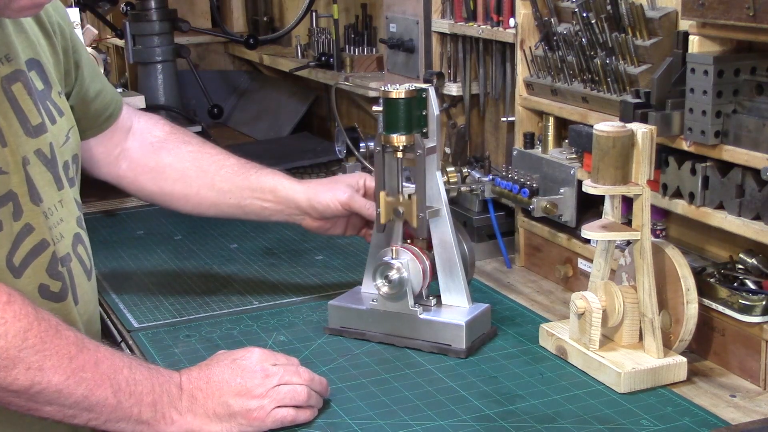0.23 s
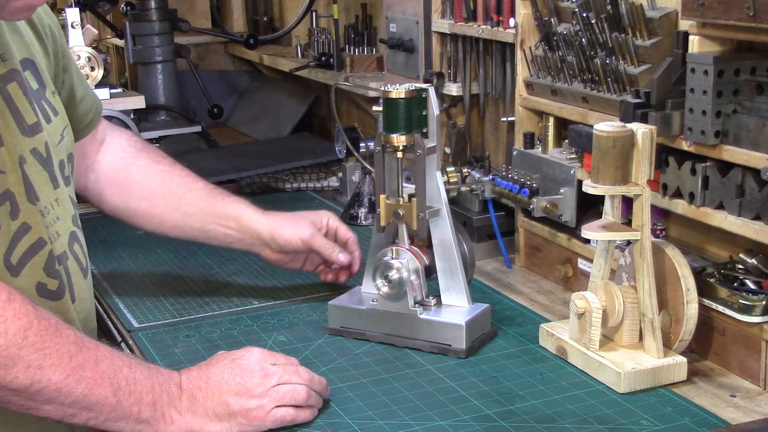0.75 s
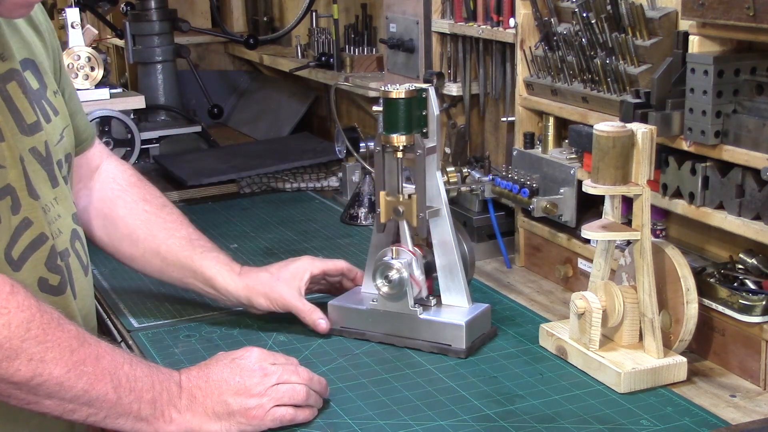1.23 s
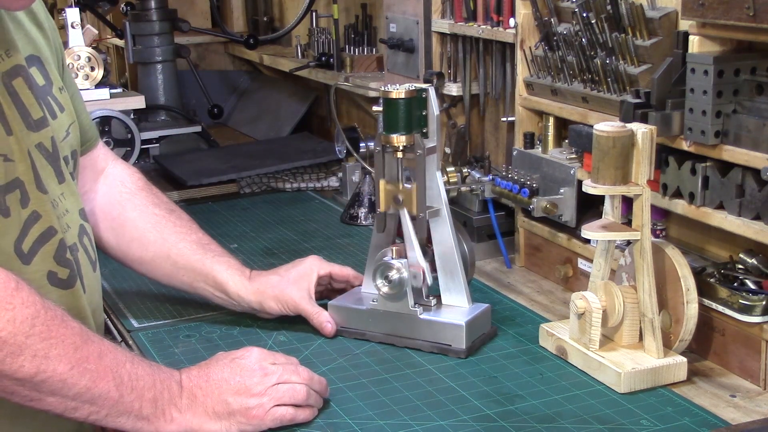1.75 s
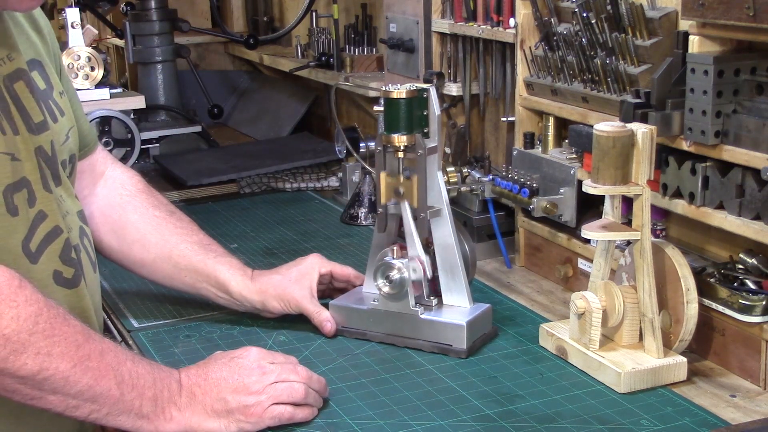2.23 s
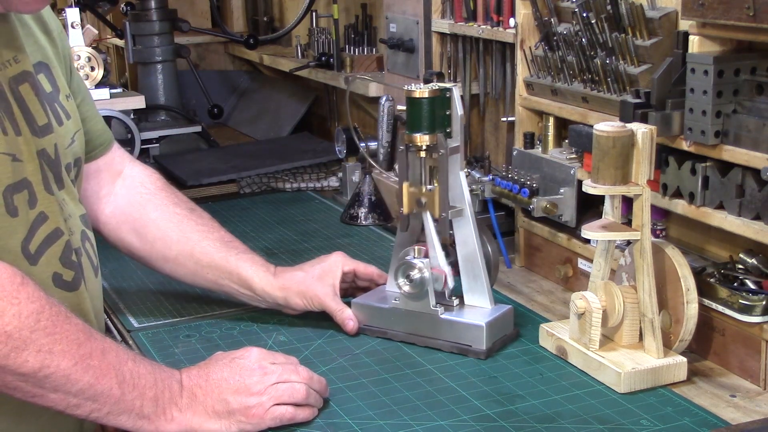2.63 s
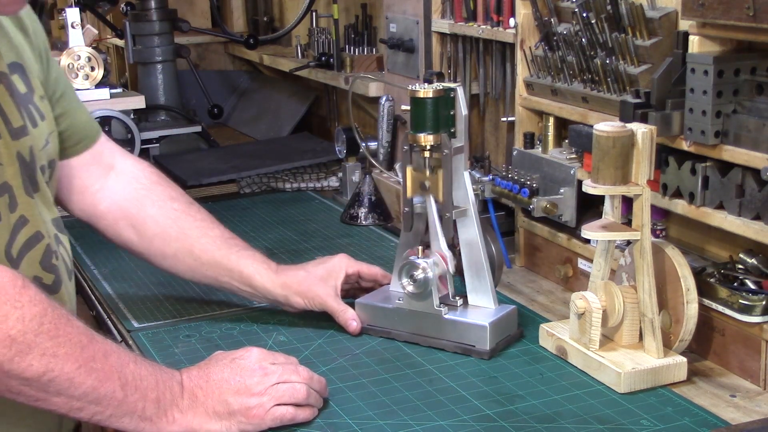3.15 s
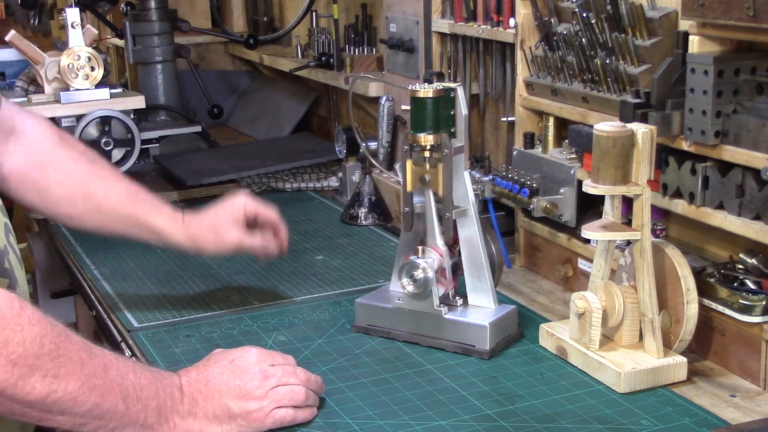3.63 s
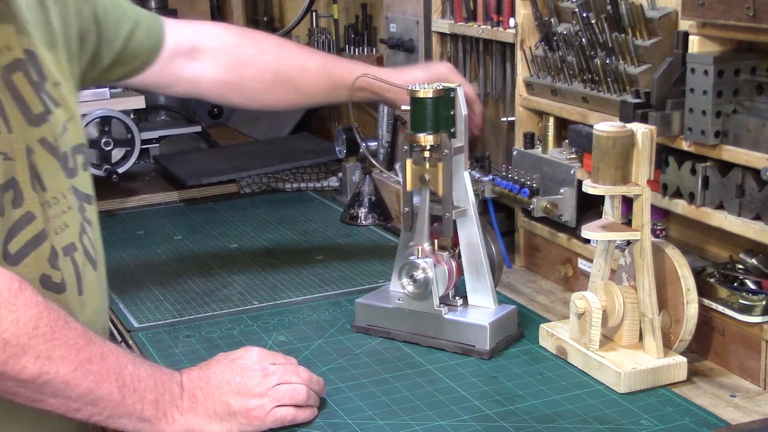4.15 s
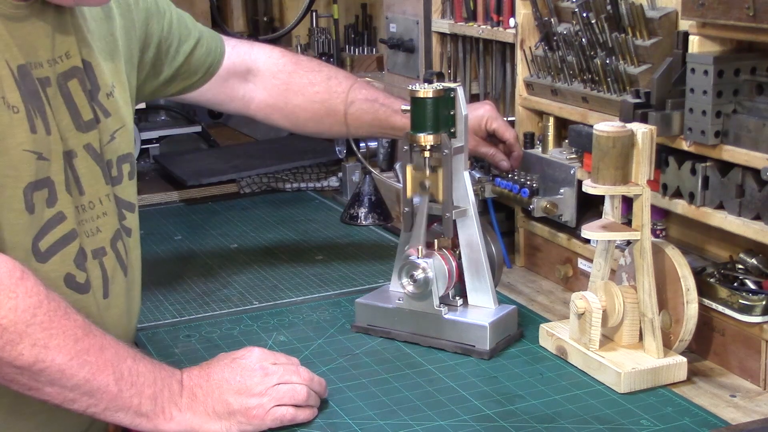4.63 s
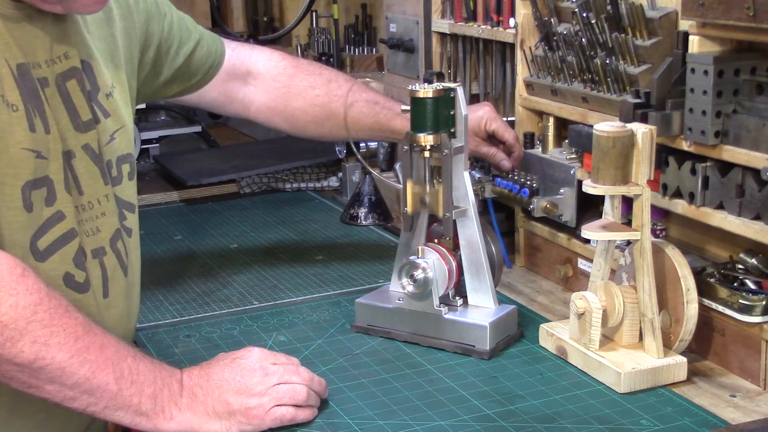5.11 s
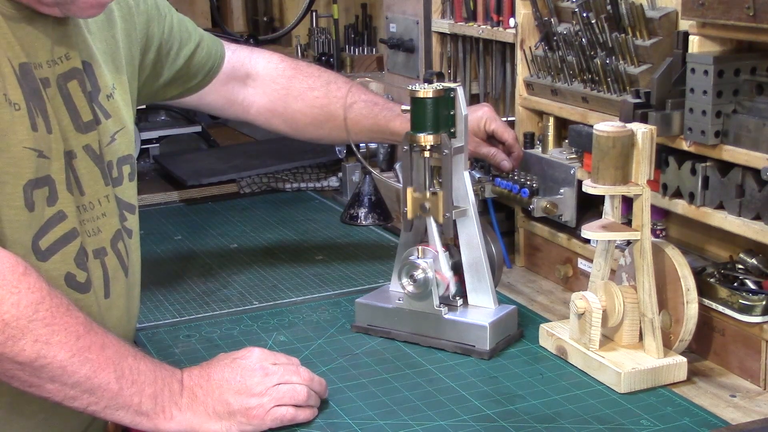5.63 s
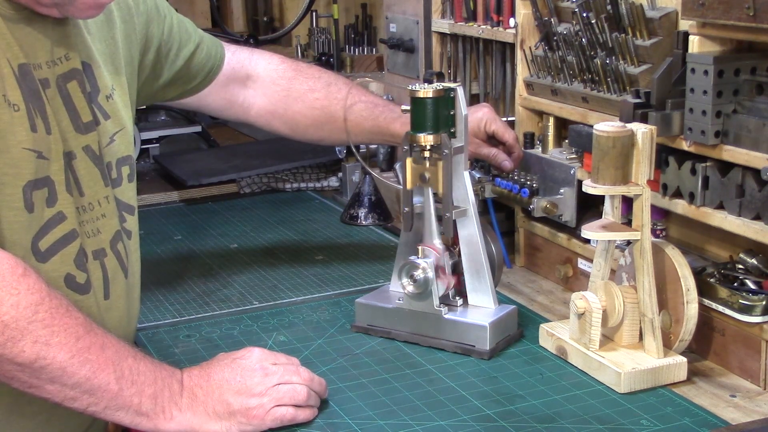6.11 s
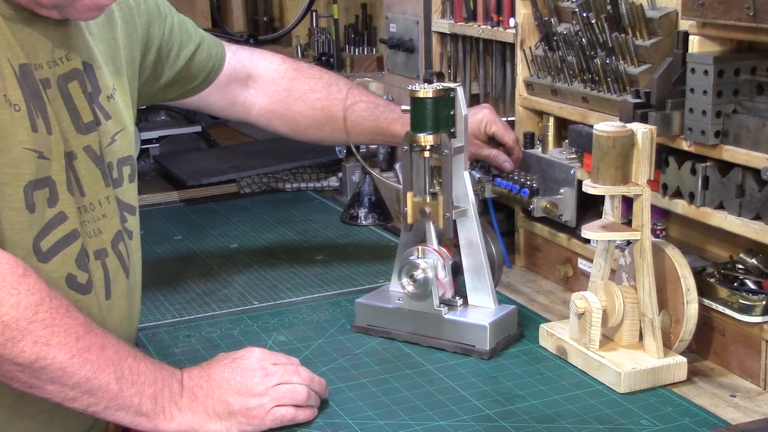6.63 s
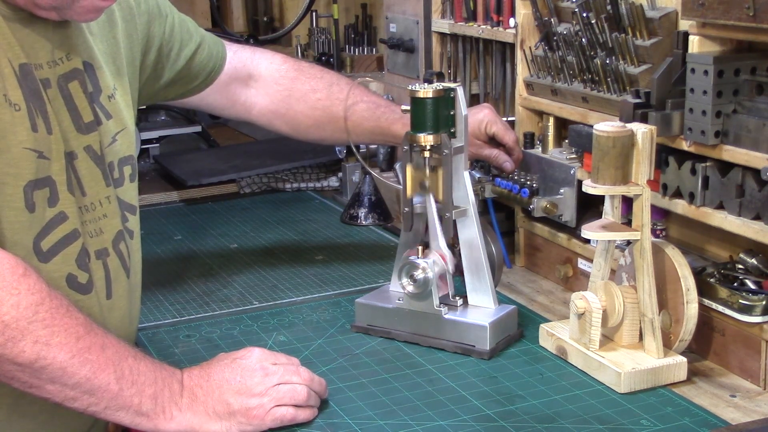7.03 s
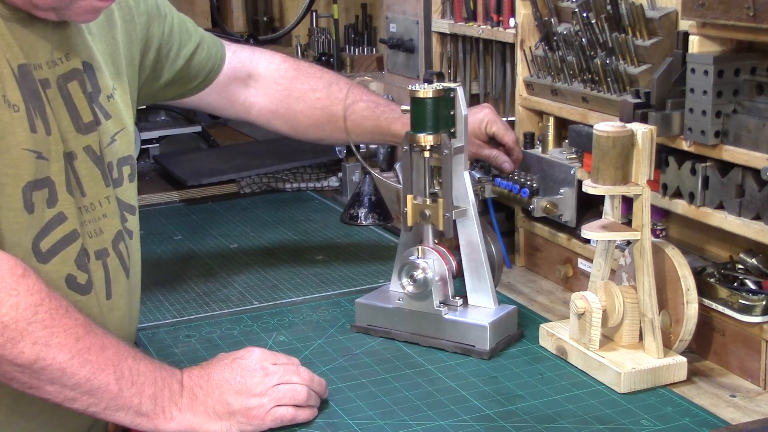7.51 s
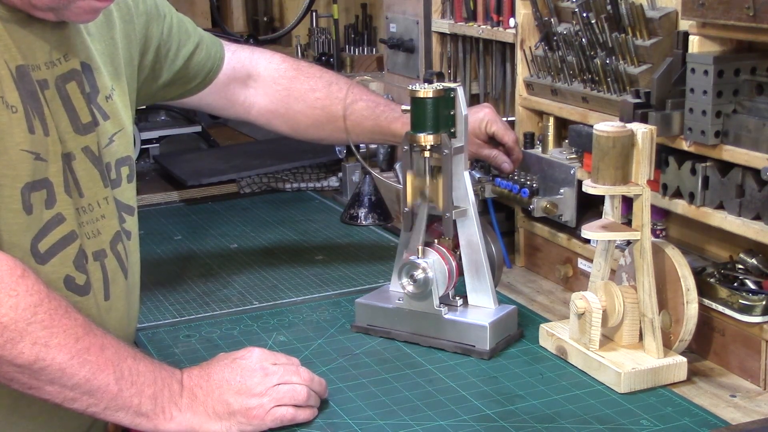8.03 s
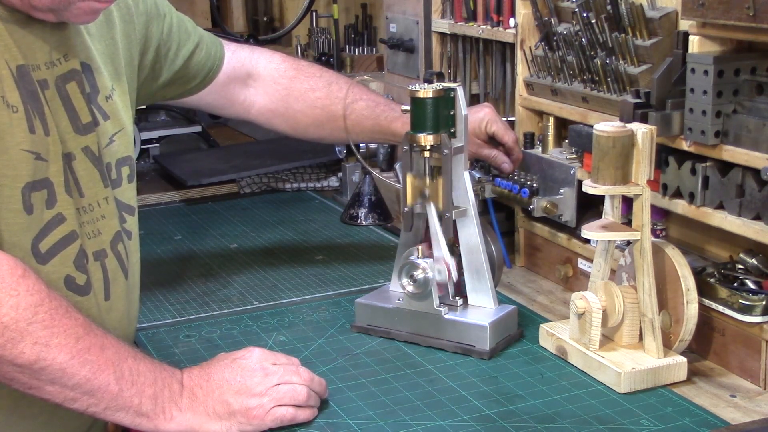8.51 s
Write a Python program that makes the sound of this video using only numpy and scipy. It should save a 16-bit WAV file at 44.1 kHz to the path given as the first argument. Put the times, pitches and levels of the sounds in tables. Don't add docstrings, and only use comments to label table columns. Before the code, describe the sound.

A model engine chuffs on a workbench, heard by a close, nearly mono camera microphone. Bright spits of escaping air come over four times a second, each with a trailing seep, a brief frame ring and low thump. Slack bearing knocks and tiny valve ticks appear between them; a sleeve brushes softly near four seconds. Then the air opens up and the beats accelerate to nearly seven a second, with a short room reply.

```python
import sys
import numpy as np
from scipy import signal
from scipy.fft import rfft, irfft, next_fast_len
from scipy.io import wavfile
from scipy.ndimage import uniform_filter1d

SR = 44100
rng = np.random.default_rng(int(sys.argv[2]) if len(sys.argv) > 2 else 0)


def field_ratio(decibels):
    return 10 ** (np.asarray(decibels, dtype=float) / 20)


def unload_audio(sound):
    columns = np.transpose(np.atleast_2d(sound))
    steps = np.round(np.clip(columns, -1, 1) * 32767)
    wavfile.write(sys.argv[1], SR, steps.astype(np.int16))


N = 386316

# port opens t/s, peak level/dB, opening time/ms
DOWN_BEATS = [(0.1994, -24.5, 11), (0.6464, -23, 12), (1.0899, -23.5, 11.2), (1.536, -22, 7.3),
              (1.9854, -22, 8.4), (2.43, -23.5, 20.4), (2.882, -22.5, 9.1), (3.3291, -23.5, 12),
              (3.784, -22, 8.7), (4.2355, -21.5, 7.7), (4.6869, -22, 7.3), (5.127, -19.5, 5.3),
              (5.5107, -22, 8.1), (5.8765, -20.5, 6.9), (6.2379, -20.5, 11), (6.563, -21, 9),
              (6.8753, -17.5, 7.4), (7.1799, -20, 7.7), (7.477, -19, 10.2), (7.776, -19.5, 4.8),
              (8.0758, -21, 8.3), (8.38, -20.5, 8.1), (8.689, -19.5, 5.9)]
UP_BEATS = [(0.402, -24.5, 13.3), (0.8471, -26.5, 13), (1.2924, -24, 9.3), (1.7396, -23, 8.1),
            (2.1883, -22, 8.3), (2.6327, -23.5, 17.7), (3.0842, -23, 11.7), (3.5339, -23.5, 11.4),
            (3.9863, -24, 12), (4.438, -23.5, 10.4), (4.8877, -21.5, 11), (5.3069, -22, 10.2),
            (5.6806, -21.5, 10.2), (6.0444, -21, 9), (6.3962, -22, 12), (6.7115, -20.5, 9.5),
            (7.0207, -20, 7.1), (7.3231, -20, 8.5), (7.6185, -20, 8.3), (7.9185, -17.5, 5.2),
            (8.2201, -22.5, 9), (8.5256, -20.5, 7.2)]
# frame jolt level/dB, top hiss level/dB, bench push delay/s, push
# level/dB
END_KICKS = [
    (-33, -36.5, 0.0023, -45),
    (-36.5, -38, 0.01223, -46),
]
# delay/s, ring level/dB, crack level/dB
PISTON_SLAPS = [
    (.008, -17.5, -33),
    (.017, -25, -13),
]
# t/s, peak level/dB, crack level/dB
BEARING_KNOCKS = [(2.132, -40, -10), (2.581, -41, -0.5), (3.031, -38, -9), (3.426, -50, -4),
                  (3.479, -38, -9.5), (3.874, -53, -3), (3.932, -40, -20), (4.328, -52, -2),
                  (4.388, -41.5, -2.5), (4.831, -39, -5.5), (5.254, -40.5, -3), (5.635, -36.5, 0),
                  (5.999, -38, 1.5), (6.67, -38, 4)]
# f/Hz, level/dB, t60/s
FRAME_MODES = [(598, -1, .035), (1023, -1, .07), (1160, 0, .06), (1275, -2, .06), (1379, -2, .12),
               (1550, -5, .05), (1800, -2, .045), (1860, -3, .06), (2260, -4, .04), (2498, -3, .04),
               (2848, -6, .04), (3187, -7, .035), (3520, -5, .035), (4250, -9, .03)]
# f/Hz, width/Hz, level/dB
PIPE_WHISTLE = [(1378, 40, 9), (2810, 60, 5), (4150, 80, 3)]


def unit(x):
    return x / np.sqrt(np.mean(x ** 2) + 1e-20)


def along(points, hz):
    f, value = np.transpose(points)
    return np.interp(np.log(hz + 1), np.log(f + 1), value)


def filtered(x, response):
    m = next_fast_len(N + SR // 2)
    return irfft(rfft(x, m) * response(np.fft.rfftfreq(m, 1 / SR)), m)[..., :N]


def high_pass(f, hz, order):
    return (1j * f / (hz + 1j * f)) ** order


def above(f, hz):
    return .5 + .5 * np.tanh((f - hz) / 250)


def resonances(peaks, flip=-1):
    def response(f):
        total = 0
        for k, (center, width, db) in enumerate(peaks):
            damping = 1j * f * width
            total = total + flip ** k * field_ratio(db) * damping / (center * center - f * f + damping)
        return total
    return response


def ringing(modes, t, scatter_db):
    total = 0
    for hz, db, t60 in modes:
        decay = field_ratio(db + scatter_db * rng.standard_normal() - 60 * t / t60)
        total = total + decay * np.sin(2 * np.pi * (hz * t + rng.random()))
    return total


def noise(response):
    return unit(filtered(rng.standard_normal((2, N)), response))


def puffs(envelope, response):
    def unit_power(f):
        r = response(f)
        return r / np.sqrt(np.mean(np.abs(r) ** 2))
    return filtered(envelope * rng.standard_normal((2, N)), unit_power)


def add(track, s, piece):
    i = round(s * SR)
    piece = piece[max(-i, 0):][:N - max(i, 0)]
    track[max(i, 0):][:len(piece)] += piece


def pressure_at(s):
    # t/s, level/dB
    pressure = [
        (0, -3),
        (1.6, -0.5),
        (4.6, 1),
        (5.2, 1.5),
        (7.1, 3),
        (7.8, 3),
        (8.4, 2.5),
        (8.76, 3),
    ]
    return np.interp(s, *np.transpose(pressure))


def beats():
    rows = []
    for k, (s, db, opening_ms) in enumerate(sorted(DOWN_BEATS + UP_BEATS)):
        jolt_db, top_db, *_ = END_KICKS[k % 2]
        pressure_db = pressure_at(s)
        jolt_db += 0.94 * pressure_db - db
        top_db += 1.3 * pressure_db - db
        rows.append((s, db, jolt_db, top_db, opening_ms))
    return rows


def port(f):
    # f/Hz, width/Hz, level/dB
    port_peaks = [(5404, 40, 6), (5545, 45, 8), (5742, 60, 8), (5830, 40, 4), (5980, 40, 3), (6300, 90, 4),
                  (6470, 50, 6), (6633, 50, 5), (6810, 70, 10), (7055, 70, 5), (7350, 60, 6), (7500, 60, 7),
                  (7735, 70, 5), (8160, 90, 6), (8490, 130, 9), (8830, 70, 2), (12300, 300, 8),
                  (12800, 200, 6), (14500, 500, 8), (15400, 300, 5)]
    return .4 + resonances(port_peaks, flip=1)(f)


def background():
    # t/s, level/dB, hold/s
    sleeve = [
        (3.17, -51.5, 0.025),
        (3.92, -49, 0.029),
    ]
    # f/Hz, level/dB per Hz
    leak_color = [(2500, -42), (4800, -48), (5400, 26), (7000, -0.5), (8600, 18), (9500, 11), (12000, -33),
                  (16000, -7)]
    # f/Hz, level/dB per Hz
    hum_color = [(25, -27), (60, -14.5), (108, -3.5), (200, -9), (320, -9.5), (700, -12), (1100, -15),
                 (1800, -18), (3000, -23), (4900, -23), (5600, -25), (9000, -27.5), (12000, -31),
                 (16000, -47)]
    cloth_color = [(300, -13), (1500, -4.5), (6000, -11), (9000, -15), (12000, -26), (16000, -36)]
    brush, t = np.zeros(N), np.arange(SR // 5) / SR
    for s, db, hold in sleeve:
        attack = np.clip(t / 0.0046, 0, 1)
        add(brush, s, attack * field_ratio(db - 60 * np.maximum(t - hold, 0) / 0.11))
    hum = noise(lambda f: field_ratio(along(hum_color, f)) * (1 + 0.52 * np.abs(resonances(PIPE_WHISTLE)(f))))
    leak = noise(lambda f: field_ratio(along(leak_color, f)) * np.abs(port(f)) ** .7)
    cloth = noise(lambda f: field_ratio(along(cloth_color, f)))
    hum_db = -57.5 + 0.71 * pressure_at(np.arange(N) / SR)
    return field_ratio(-74.5) * leak + field_ratio(hum_db) * hum + brush * cloth


def bearing():
    # t/s, level/dB
    ticks = [(1.254, -52), (2.825, -49), (3.033, -57), (3.426, -56), (3.478, -50), (3.76, -58),
             (4.327, -54), (4.83, -55), (5.225, -58), (5.254, -54), (5.635, -52), (5.962, -51),
             (5.999, -56), (6.669, -55)]
    # f/Hz, level/dB, t60/s
    block_modes = [(660, 0, .04), (1380, -12, .02), (2480, -12, .012)]
    out, t = np.zeros(N), np.arange(SR // 12) / SR
    for s, db, crack_db in BEARING_KNOCKS:
        grit = np.convolve(rng.standard_normal(len(t)), np.hanning(15) / 7, "same")
        crack = field_ratio(np.clip(crack_db, -20, 0) + 11 - 60 * t / .03) * grit
        crack -= uniform_filter1d(crack, size=60)
        knock = ringing(block_modes, t, scatter_db=1.5) * (1 - np.exp(-t / .0004))
        bounce = ringing(block_modes[:2], t, scatter_db=1.5) * (1 - np.exp(-t / .002))
        add(out, s + .0005, field_ratio(db + 2.0) * (knock + crack))
        add(out, s + .022, field_ratio(db - 11) * bounce)
    for s, db in ticks:
        tick = rng.standard_normal(len(t) + 2)
        add(out, s, field_ratio(db - 1 - 60 * t / .012) * (tick[2:] - tick[:-2]))
    return out


def bench():
    # f/Hz, width/Hz, level/dB
    top_peaks = [(139, 32, 0), (175, 55, -1), (250, 60, -8), (305, 60, -9)]
    # t/s, level/dB
    nudges = [(2.103, -50), (2.533, -50.5), (2.981, -46), (3.429, -46), (3.87, -49), (4.324, -50),
              (4.779, -51), (5.225, -50), (5.839, -52), (5.968, -48), (6.642, -49)]
    # t/s, level/dB, f/Hz, t60/s
    elbow = (3.935, -43, 70, .1)
    pushes, t = np.zeros(N), np.arange(SR // 5) / SR
    push = np.hanning(round(0.0039 * SR))
    for k, (s, *_) in enumerate(beats()):
        *_, delay, db = END_KICKS[k % 2]
        db += 0.44 * pressure_at(s) + 0.4 * rng.standard_normal()
        add(pushes, s + delay - .003, -field_ratio(db + 9.5) * push)
        add(pushes, s + delay + 0.0034, field_ratio(db + 23.5) * push)
    rolls = [(s - .005, db) for s, db in nudges]
    rolls += [(s + 0.0026, db - 8.5) for s, db, _ in BEARING_KNOCKS]
    turns = np.diff(np.array(DOWN_BEATS)[:, 0])
    for (s, *_), turn in zip(UP_BEATS, turns):
        rolls.append((s - .075 * turn, -50.5 + 37 * np.log10(turns[0] / turn)))
    for s, db in rolls:
        add(pushes, s - .006, field_ratio(db + 19) * push)
        add(pushes, s + 0.00786, field_ratio(db + 14 + 2.5 * rng.standard_normal()) * push)
    out = filtered(pushes, lambda f: resonances(top_peaks)(f) * high_pass(f, 105, 3))
    s, db, hz, t60 = elbow
    add(out, s, field_ratio(db) * ringing([(hz, 0, t60)], t, scatter_db=0) * (1 - np.exp(-t / .008)))
    return out


def frame():
    out, t = np.zeros(N), np.arange(SR // 6) / SR
    for k, (s, db, jolt_db, *_) in enumerate(beats()):
        delay, slap_db, crack_db = PISTON_SLAPS[k % 2]
        ring = field_ratio(slap_db) * ringing(FRAME_MODES, t, scatter_db=4.5) * (1 - np.exp(-t / .0006))
        crack = field_ratio(crack_db - 60 * t / 0.0035) * uniform_filter1d(rng.standard_normal(len(t)), size=4)
        jitter = 0.000944 * rng.standard_normal()
        add(out, s + delay + jitter, field_ratio(db + jolt_db) * (ring + crack))
    return filtered(out, lambda f: high_pass(f, 250, 2))


def exhaust():
    # f/Hz, level/dB per Hz
    jet_color = [(350, -11.5), (600, -13.5), (1200, -9.5), (2200, -12), (3530, -8.5), (4950, -11),
                 (5400, -17.5), (7000, -6.5), (8600, -15), (9400, -24.5), (11000, -22), (12500, -21),
                 (15000, -18.5), (16000, -23.5)]
    # fast t60/s, tail level/dB, tail t60/s, seep level/dB, seep t60/s, brightness/dB,
    # share of the stroke with the port open
    ends = [
        (.05, -9.5, 0.21, -30.5, 0.49, 0, 0.55),
        (.07, -8, 0.11, -22, 0.92, 0.5, 0.9),
    ]
    t = np.arange(SR // 2) / SR
    body, edge, top, low = np.zeros((4, N))
    puffed = [(-0.038, *beats()[1][1:])] + beats()
    strokes = np.diff([row[0] for row in puffed], append=puffed[-1][0] + .145)
    for k, (s, db, jolt_db, top_db, opening_ms) in enumerate(puffed):
        end = 1 - k % 2
        fast, tail_db, tail, seep_db, seep, bright_db, share = ends[end]
        opening = np.clip(opening_ms, 3, 20) / 1000 + 0.00083
        after = np.maximum(t - opening, 0)
        still_open = .5 - .5 * np.tanh((t - share * strokes[k]) / 0.0037)
        flow = field_ratio(-60 * after / fast) + field_ratio(tail_db - 60 * after / tail)
        flow += field_ratio(seep_db - 60 * after / seep) * still_open
        flow *= np.sin(np.pi / 2 * np.clip(t / opening, 0, 1)) ** 1.77
        add(body, s - .002, field_ratio(db - 10) * flow)
        add(edge, s - .003, field_ratio(db + bright_db - 13) * flow ** 1.186)
        add(top, s - .002, field_ratio(db + top_db - 8.5) * flow ** 1.18)
        add(low, s - .003 + 0.38 * PISTON_SLAPS[end][0], field_ratio(db + jolt_db - 6) * flow ** 0.96)

    flutter_db = unit(uniform_filter1d(rng.standard_normal(N), size=60))
    eddies = unit(field_ratio(flutter_db))

    def band(lo, hi):
        return lambda f: field_ratio(along(jet_color, f)) * port(f) * above(f, lo) * (1 - above(f, hi))

    shelf = field_ratio(-12.5) * np.pad(body, (SR // 300, 0), "edge")[:N] ** 0.84
    hiss = puffs(eddies * shelf, band(5050, 6150))
    hiss += puffs(eddies * body, band(6150, 7950))
    hiss += puffs(eddies * edge, band(7950, 10500))
    hiss += puffs(eddies * top, band(10500, 17000))
    song = puffs(field_ratio(-40.5) * body ** 0.48, resonances(PIPE_WHISTLE))
    shell = resonances([(hz, 7 / t60, db + 5) for hz, db, t60 in FRAME_MODES], flip=1)

    def shaken(f):
        return field_ratio(along(jet_color, f)) * (.8 + shell(f)) * (1 - above(f, 4900)) * high_pass(f, 200, 2)

    return hiss + song + np.array([[1], [.25]]) * puffs(low, shaken)


def room(x):
    # f/Hz, t60/s
    decay = [(200, 0.31), (1400, .25), (4000, 0.13), (10000, 0.036)]
    hz, t, z = signal.stft(rng.standard_normal((2, SR // 3)), SR, nperseg=256)
    fade = field_ratio(-60 * t / along(decay, hz)[:, None])
    tail = signal.istft(z * fade, SR, nperseg=256)[1]
    delayed = np.pad(x, (200, 0))[None]
    return signal.fftconvolve(delayed, tail / np.linalg.norm(tail[0]), axes=1)[:, :N]


def scene():
    # f/Hz, side minus mid level/dB
    width = [(60, -7), (110, -26.5), (250, -15), (500, -11.5), (1000, -18.5), (2400, -19.5), (5000, -14),
             (8000, -16), (12000, -18.5)]
    air, jolts, knocks, thumps = exhaust(), frame(), bearing(), bench()
    echoes = room(field_ratio(-9.5) * jolts + field_ratio(-14) * air[0] + field_ratio(-11) * knocks + field_ratio(-13) * thumps)
    direct = air * np.array([[1], [.7]]) + (jolts + knocks + thumps) * np.array([[1], [.3]])
    mid, side = direct + echoes + background()
    side = filtered(side, lambda f: field_ratio(along(width, f)))
    return np.array([mid + side, mid - side])


def roll_off(x):
    return signal.sosfilt(signal.butter(12, 16990, fs=SR, output="sos"), x)


def record(dry):
    heard = filtered(dry, lambda f: high_pass(f, 40, 2) * np.where(f < 15900, 1, field_ratio(-30)))
    return roll_off(heard)


dry = scene()
out = record(dry)
unload_audio(out)
```